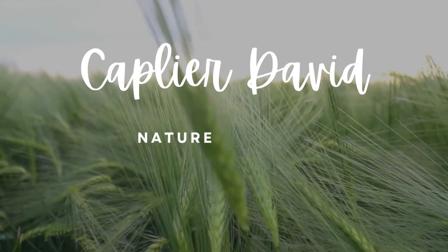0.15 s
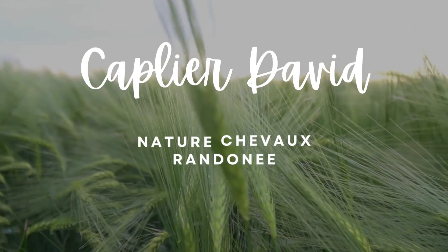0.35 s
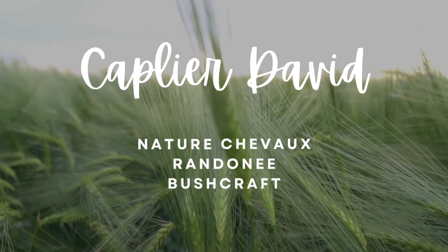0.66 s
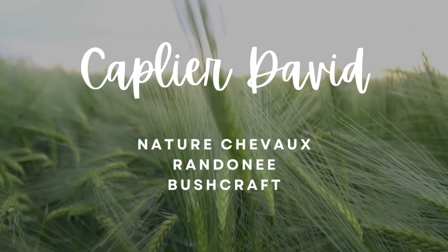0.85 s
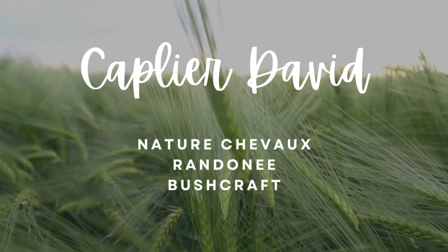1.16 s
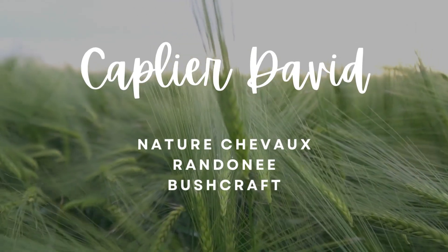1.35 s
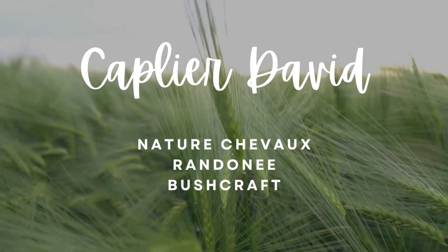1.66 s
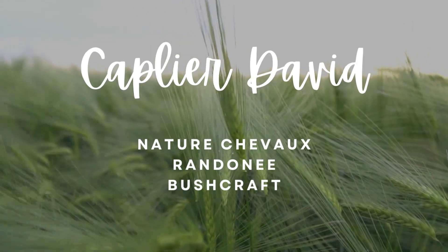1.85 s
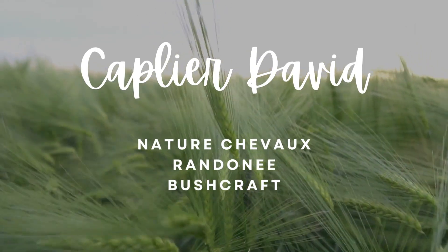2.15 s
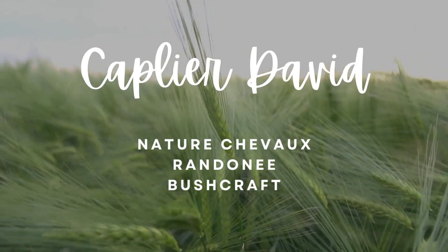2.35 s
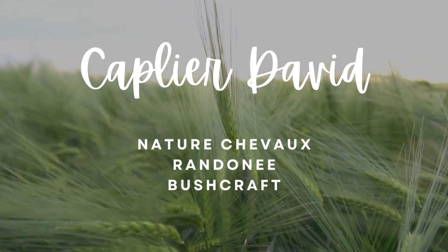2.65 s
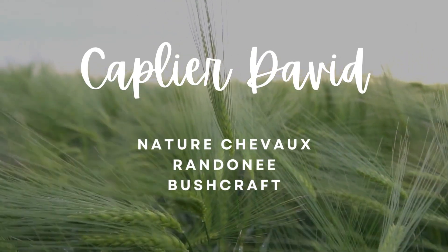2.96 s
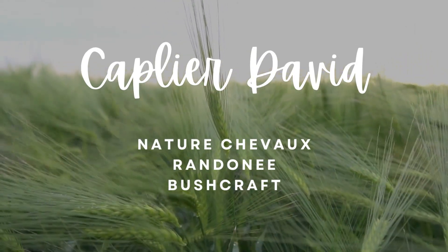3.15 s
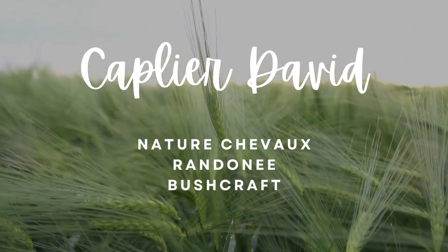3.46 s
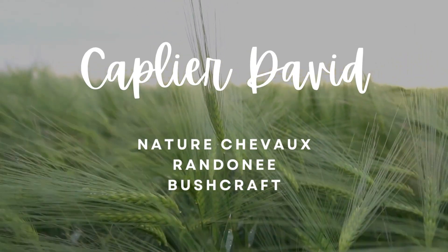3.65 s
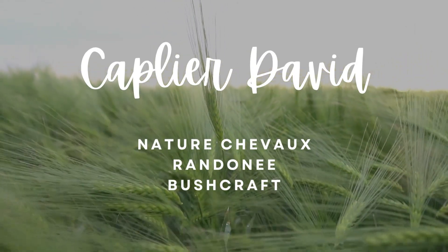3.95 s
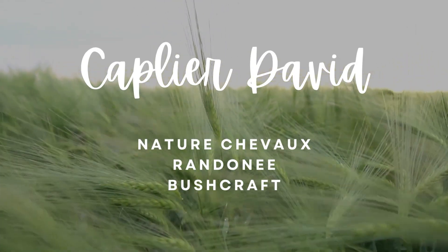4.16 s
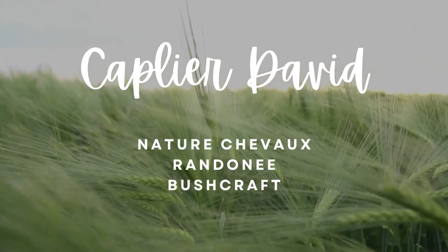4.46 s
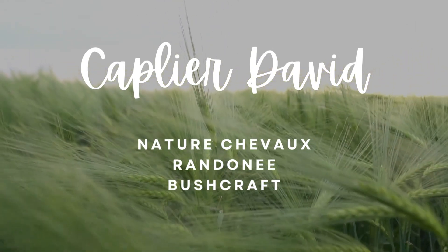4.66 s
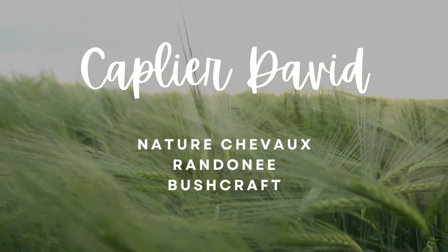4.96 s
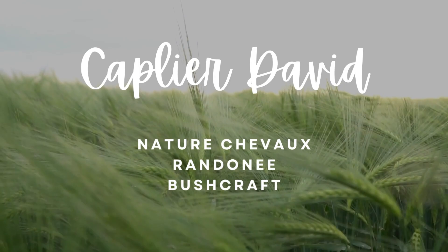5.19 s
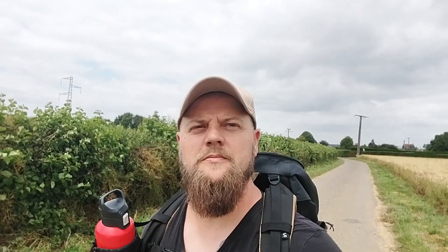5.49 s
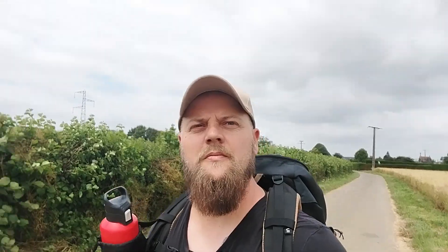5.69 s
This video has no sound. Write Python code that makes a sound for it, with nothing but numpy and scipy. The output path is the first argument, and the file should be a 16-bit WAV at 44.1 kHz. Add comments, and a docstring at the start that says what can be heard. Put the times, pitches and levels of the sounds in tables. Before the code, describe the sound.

Quiet stereo countryside: soft airy hum, swishing crop and fine dry scratching, mostly close by. A clear high cricket repeats pulsed chirps on the left, roughly twice every second at first, then more widely spaced. One buzzy bird call slurs downward near one second; far whistles stay dim. After a final swish comes an abrupt near silence, then low wind buffeting on the microphone.

```python
"""A breeze hums and rustles the barley from the start: noise shaped by spectra, swells and tiny scratches.
Faint crickets and birds sound through echoes, and stalks tap in short bursts of noise.
From 0.3 s a near cricket chirps, four or five wing strokes of falling tone to a chirp; at 1.1 s a small
bird calls once in gliding tones. Near 5.5 s the field drops almost to silence, then low noise
that swells quickly makes wind buffet the microphone."""
import sys
import numpy as np
from scipy import signal
from scipy.fft import rfft, irfft, next_fast_len
from scipy.io import wavfile

SR = 44100
rng = np.random.default_rng(int(sys.argv[2]) if len(sys.argv) > 2 else 0)


def int16_out(signal):
    """Quantize to a 16-bit WAV file."""
    q = np.round(np.clip(np.atleast_2d(signal).T, -1, 1) * 32767)
    wavfile.write(sys.argv[1], SR, q.astype(np.int16))


N = 256869
TIME = np.arange(N) / SR
FIELD_END_S = 5.523
CUTOFF_HZ = 15850

# Noise colours, before each sound is brought to its own level: f/Hz, relative level per Hz/dB
# The breeze's far hum, its brighter ringing edge, the swish of the whole crop, a sliding leaf
HUM_SPECTRUM = [(60, -29.5), (200, -29.5), (300, -25), (420, -12), (600, -1), (800, 0), (1000, 1),
                (1250, -5.5), (1600, -15), (3000, -33)]
EDGE_SPECTRUM = [(600, -28), (880, -6), (990, 4.5), (1120, -7), (1300, -16), (1550, -9), (2100, -16),
                 (3000, -28), (6000, -46)]
SWISH_SPECTRUM = [(300, -8), (1000, -4.5), (1600, 3), (2100, 4), (2500, 1), (3000, 0.5), (3800, -1),
                  (5000, -2), (7000, -5), (10000, -8.5), (16000, -5.5)]
LEAF_SPECTRUM = [(1200, -17), (2000, -5), (3200, -2), (5500, -1.5), (7000, -7.5), (10000, -7.5),
                 (16000, -26)]
# Stiff ears scrape lower than their fine bristles: f/Hz, relative level per Hz/dB
EAR_SPECTRUM = [(1500, -29.5), (3500, -7), (5500, -4.5), (7200, -4.5), (8400, 0.5), (9700, -1), (11300, -6),
                (13500, -12), (16000, -11)]
BRISTLE_SPECTRUM = [(3000, -23.5), (7200, -17), (9500, -7.5), (11200, 1), (13500, -2.5), (16000, -3)]
# Wind rumble at the microphone, and the smaller eddies of a stronger gust: f/Hz, relative level per Hz/dB
BUFFET_SPECTRUM = [(25, -47), (45, -13.5), (70, 1.5), (140, -1.5), (200, 0), (255, -6), (330, -21),
                   (480, -36.5), (800, -48.5), (1500, -52.5), (5000, -45.5), (8500, -53), (12000, -48.5),
                   (16000, -45.5)]
EDDY_SPECTRUM = [(200, -11), (350, 4.5), (600, -5.5), (1000, -18.5), (2000, -20.5), (5000, -31)]

# The breeze's far hum, before its overall gain and flutter: t/s, level/dB
HUM_LEVELS = [(0.0, -57), (1.27, -55), (1.33, -59), (1.91, -58.5), (2.01, -54.5), (2.16, -57),
              (2.19, -60.5), (2.56, -61.5), (2.84, -58.5), (3.5, -59.5), (3.98, -56), (4.04, -57.5),
              (4.32, -57.5), (4.43, -56), (5.2, -58.5)]
# The hum takes on its ringing edge: peak t/s, width/s, level/dB
EDGE_RISES = [(.6, 0.19, -62), (2.02, .1, -59), (3.88, 0.17, -61.5), (4.53, 0.14, -53)]
EDGE_REST_DB = -70.5
# Gusts through the whole crop: peak t/s, width/s, level/dB
CROP_GUSTS = [(.12, 0.097, -66), (5.42, 0.3, -54.5)]
SWISH_REST_DB = -61.5
# A leaf slides softly past, before its flutter: peak t/s, width/s, level/dB
LEAF_PASSES = [(.11, .04, -68), (.68, 0.064, -63.5), (3.87, 0.17, -60.5), (5.48, 0.33, -58)]
# The nearest ears sway into each other, before the ear and bristle gains:
# t/s, length before dying away/s, level/dB, left over right/dB
EAR_SWAYS = [(.95, 0.073, -60, -4), (1.13, 0.18, -60, -3), (1.386, 0.35, -56, -5), (1.721, .1, -53.5, -3.5),
             (1.806, 0.09, -51.5, -2.5), (2.033, 0.034, -60.5, -5), (2.208, .18, -55.5, -7.5),
             (2.48, 0.26, -57.5, -5.5), (2.737, .18, -55.5, -6), (2.957, 0.092, -59, -5),
             (3.06, .12, -56, -3.5), (3.385, .08, -63.5, -4), (3.654, 0.12, -56, -.5),
             (3.86, 0.18, -60.5, 0), (5.33, 0.23, -58.5, 1.5)]
SWAY_ATTACK_S, SWAY_RELEASE_S = 0.028, 0.059
RUSTLE_REST_DB = -63  # between sways the ears still stir

# A neighbour's chirps, before the echoes: t/s, strokes, level/dB
ANSWER_CHIRPS = [(.03, 3, -67), (3.3, 3, -64.5), (4.24, 3, -62.5), (4.68, 4, -65)]
# Stalks snapping and tapping: t/s, level/dB, centre f/Hz, decay/s, left over right/dB
STALK_TAPS = [(.035, -47, 2137, 0.0037, -1), (.137, -46, 4600, 0.0019, 2), (.621, -50, 4270, .003, -9),
              (0.65, -49.5, 1840, 0.0031, -6), (1.381, -46, 11000, 0.0037, -9),
              (1.513, -45, 11200, .003, -11), (1.563, -42.5, 11040, .003, -13),
              (1.707, -49.5, 4300, 0.0048, -8), (1.842, -48, 4480, .004, -9),
              (1.9, -47.5, 4100, 0.0046, -15), (2.07, -50.5, 11000, 0.0033, -6),
              (2.263, -45, 11000, 0.0033, -17), (2.284, -44.5, 7760, 0.0018, -5),
              (2.389, -52, 11060, 0.0025, -4.5), (2.839, -49, 9900, .003, -2),
              (3.058, -43, 13500, .002, -12)]

# Far birds' whistles: t/s, length/s, start f/Hz, end f/Hz, level/dB, left over right/dB
FAR_WHISTLES = [(0.269, 0.34, 2561, 2620, -71, 8), (1.74, 0.13, 2217, 2066, -67, -6),
                (2.281, 0.12, 2430, 2370, -73, -3), (3.456, 0.22, 2060, 1970, -73, -22),
                (4.148, .2, 2130, 2060, -72.5, 6), (4.756, 0.14, 2620, 2603, -63, 3),
                (5.118, 0.059, 6050, 5950, -59, 10)]
# The near bird's syllables: t/s, length/s, start f/Hz, end f/Hz, level/dB, roughness/0-1
BIRD_SYLLABLES = [(1.089, 0.042, 6650, 6320, -57.5, 0.7), (1.13, 0.044, 4260, 6550, -60.5, .9),
                  (1.176, 0.038, 6250, 6460, -55, 1.0), (1.212, .024, 6300, 5320, -50.5, .35),
                  (1.223, 0.063, 5280, 4790, -51, .08)]
GLIDE_SETTLING = 2.4  # a syllable's glide slows as it nears its end pitch

# One wing stroke; the scraper slows along the file: t from its peak/s, share of pitch, level/dB
# Later strokes stretch these times, and each chirp sets the overall level
STROKE_SHAPE = [(-.017, 0.89, -42.5), (-.0125, .995, -26), (-.009, 1.003, -11.5), (-.005, 1.007, -3.5),
                (0, 1, -1.5), (.004, 0.9915, -4), (.0075, .98, -9), (0.011, .968, -29), (0.016, 0.927, -58)]
FLICK_DELAY_S, FLICK_WIDTH_S = 0.0137, 0.002  # stretched too
# Chirps: first stroke t/s, strokes, full pitch f/Hz, full level/dB, first stroke weaker by/dB,
# slowing/s, left over right/dB, full closing flick before its gain/dB
CRICKET_CHIRPS = [(.292, 5, 4317, -52.5, 17, 0.0012, 13, -47.5), (.923, 4, 4307, -43, 12, 0.0014, 24, -51),
                  (1.419, 5, 4320, -42, 10.5, .00145, 25, -49.5),
                  (2.057, 4, 4300, -37.5, 11.5, 0.0013, 9.5, -51),
                  (2.592, 4, 4330, -39, 6, .001, 8.5, -51.5), (3.085, 4, 4330, -42.5, 3.5, .0008, 7, -52.5),
                  (3.604, 5, 4317, -45, 5, .0012, 23, -51.5), (4.373, 5, 4305, -38, 6, .0012, 14, -54.5),
                  (5.057, 5, 4302, -40, 2, 0.0011, 12.5, -53.5)]
STROKE_GAP_S = .0493  # first gap; later ones add slowing times the stroke's number squared
FIRST_FLAT_HZ, FIRST_FLICK_WEAKER_DB = 72, 6.5  # the first stroke is flat and closes gently
WEAKNESS_KEPT, FLATNESS_KEPT = 0.4, 0.47  # share of that shortfall left in each next stroke

# Puffs of wind on the microphone: peak t/s, width/s, level/dB
WIND_PUFFS = [(.66, .06, -78.5), (1.33, .05, -77.5), (1.59, .045, -72)]
PUFF_REST_DB = -94
GUST_START_S, GUST_RISE_S, GUST_DB = 5.64, 0.027, -31.5  # the strong gust at the end


def from_db(db):
    """Turn decibels into gain."""
    return 10 ** (np.asarray(db) / 20)


def rms_one(x):
    """Scale a sound to an rms of 1."""
    return x / np.sqrt(np.mean(x ** 2) + 1e-20)


def bell(t, width):
    """A smooth bump, 1 at time zero."""
    return np.exp(-.5 * (t / width) ** 2)


def panned(pan_db):
    """Left and right gains of constant power; positive leans left."""
    pair = from_db(np.array([[.5], [-.5]]) * pan_db)
    return pair / np.sqrt(np.mean(pair ** 2, axis=0))


def drift(rate):
    """A smooth random wander of rms about 1; a higher rate in Hz makes it quicker."""
    # worked out at every 20th sample, then joined by straight lines
    r = np.exp(-40 * np.pi * rate / SR)
    noise = rng.standard_normal(N // 20 + 4002)
    slow = signal.lfilter([1], [1, -2 * r, r * r], noise)[4000:]
    return np.interp(np.arange(N) / 20, np.arange(len(slow)), rms_one(slow))


def tone(hz):
    """A sine of rms 1 that follows a pitch curve."""
    return np.sqrt(2) * np.sin(2 * np.pi * np.cumsum(hz) / SR)


def stereo_noise(likeness):
    """White noise, partly shared by the two sides."""
    mid, side = rng.standard_normal((2, N))
    shared = np.clip(likeness, 0, .99)
    return np.sqrt((1 + shared) / 2) * mid + np.sqrt((1 - shared) / 2) * side * [[1], [-1]]


def coloured(x, spectrum):
    """Give a sound a spectrum and an rms of 1."""
    hz, db = np.transpose(spectrum)
    size = next_fast_len(N + SR // 10)
    bins = np.maximum(np.fft.rfftfreq(size, 1 / SR), 1)
    gain = from_db(np.interp(np.log(bins), np.log(hz), db))
    gain *= np.minimum(bins / hz[0], 1) ** 2  # fade the bass below the first row
    return rms_one(irfft(rfft(x, size) * gain)[:, :N])


def scatter(x, t60, first_s):
    """Countless small echoes off the stalks, different on each side, falling 60 dB in t60 seconds."""
    t = np.arange(SR // 2) / SR
    onset = np.clip(t / first_s - 1, 0, 1)  # silent until first_s, full at twice that
    echoes = rng.standard_normal((2, len(t))) * from_db(-60 * t / t60) * onset
    echoes /= np.sqrt(np.sum(echoes ** 2, axis=1, keepdims=True))
    return signal.fftconvolve(x[None], echoes, axes=1)[:, :N]


def swells(rows, rest_db=-120):
    """Gain of bell-shaped swells over a resting level, their powers added."""
    power = from_db(rest_db) ** 2
    for s, width, db in rows:
        power = power + (from_db(db) * bell(TIME - s, width)) ** 2
    return np.sqrt(power)


def rustle(spectrum, touches_per_s, size_db, touch_s, smooth_share, flutter_db, likeness):
    """Ears of barley brush each other in many tiny scratches over a smooth hiss."""
    sizes = from_db(size_db * np.minimum(rng.exponential(1, N), 3.5)) ** 2
    touches = (rng.random(N) < touches_per_s / SR) * sizes
    r = np.exp(-1 / (touch_s * SR))
    power = signal.lfilter([1], [1, -2 * r, r * r], touches + 1e-18)  # each scratch swells and dies
    grain = np.sqrt(smooth_share + (1 - smooth_share) * power / power.mean())
    flutter = from_db(flutter_db * drift(33))
    return coloured(stereo_noise(likeness) * grain * flutter, spectrum)


def swaying():
    """Left and right gain of the nearest ears: each sway sets in, holds and dies away to a faint stir."""
    power = from_db(RUSTLE_REST_DB) ** 2
    for s, length, level_db, pan_db in EAR_SWAYS:
        attack = np.clip((TIME - s) / SWAY_ATTACK_S, 0, 1)
        release = np.exp(-np.maximum(TIME - s - length, 0) / SWAY_RELEASE_S)
        power = power + (attack * release * from_db(level_db) * panned(pan_db)) ** 2
    return np.sqrt(power)


def breeze(hum_gain_db=1.55, hum_pan_db=-6.5, edge_pan_db=-8, swish_pan_db=-2,
           ears_db=-2.5, bristles_db=-2.0, ears_pan_db=1.5, bristles_pan_db=-5.0):
    """Moving air: a hum from afar, the swish of the whole crop, the rustle of the nearest ears and leaves."""
    hum_db = np.interp(TIME, *np.transpose(HUM_LEVELS)) + hum_gain_db + 0.44 * drift(27)
    hum = coloured(stereo_noise(likeness=0.66), HUM_SPECTRUM) * from_db(hum_db) * panned(hum_pan_db)

    edge = coloured(stereo_noise(likeness=0.12), EDGE_SPECTRUM)
    edge = edge * swells(EDGE_RISES, EDGE_REST_DB) * panned(edge_pan_db)
    swish = coloured(stereo_noise(likeness=0.22), SWISH_SPECTRUM)
    swish = swish * swells(CROP_GUSTS, SWISH_REST_DB) * panned(swish_pan_db)
    leaf = coloured(stereo_noise(likeness=0.71), LEAF_SPECTRUM)
    leaf = leaf * swells(LEAF_PASSES) * from_db(2 * drift(60))

    ears = rustle(EAR_SPECTRUM, touches_per_s=600, size_db=5.0, touch_s=0.00057,
                  smooth_share=0.75, flutter_db=1.25, likeness=0.86)
    bristles = rustle(BRISTLE_SPECTRUM, touches_per_s=840, size_db=2.0, touch_s=0.00044,
                      smooth_share=.45, flutter_db=1.3, likeness=1.0)
    near = ears * from_db(ears_db) * panned(ears_pan_db)
    near = near + bristles * from_db(bristles_db) * panned(bristles_pan_db)
    near = near * swaying() * from_db(0.95 * drift(25))
    return hum + edge + swish + leaf + near


def far_chorus(hz=2520, wander=.04, level_db=-70, swell_db=5.0, pan_db=2):
    """Very distant birdsong melts into a faint band: one wavering tone, blurred by echoes."""
    song = tone(hz * (1 + wander * drift(40))) * from_db(swell_db * drift(20))
    return from_db(level_db) * scatter(rms_one(song), t60=0.1, first_s=0.0059) * panned(pan_db)


def far_crickets(hz=4330, stroke_gap_s=0.0493, stroke_s=0.0085, blur=0.016, pan_db=2):
    """A neighbour answers with bell-shaped strokes of tone, blurred by distance."""
    level = np.zeros(N)
    for s, count, level_db in ANSWER_CHIRPS:
        for k in range(round(count)):
            level += from_db(level_db) * bell(TIME - s - k * stroke_gap_s, stroke_s)
    song = tone(hz * (1 + blur * drift(99.44))) * level
    return scatter(song, t60=0.089, first_s=0.0017) * panned(pan_db)


def stalk_ticks():
    """Dry stalks knock together: a brief burst in one broad resonance."""
    out, t = np.zeros((2, N)), np.arange(SR // 20) / SR
    for s, level_db, hz, decay, pan_db in STALK_TAPS:
        edges = [hz * 0.93, min(hz * 1.12, SR * .44)]
        band = signal.butter(1, edges, "band", fs=SR, output="sos")
        ring = rms_one(signal.sosfilt(band, rng.standard_normal(len(t))))
        start = int(s * SR)
        burst = ring * np.exp(-t / decay) * from_db(level_db)
        out[:, start:start + len(t)] += burst * panned(pan_db)
    return out


def note_span(s, length):
    """The samples of a note, and its progress from 0 to 1."""
    span = slice(int(s * SR), int((s + length) * SR))
    return span, np.linspace(0, 1, span.stop - span.start)


def whistles():
    """Far birds whistle plain notes that glide evenly, swell and fade."""
    out, waver = np.zeros((2, N)), 1 + 0.0028 * drift(30)
    for s, length, start_hz, end_hz, level_db, pan_db in FAR_WHISTLES:
        span, u = note_span(s, length)
        hz = (start_hz + (end_hz - start_hz) * u) * waver[span]
        swell = np.sqrt(4 * u * (1 - u))
        out[:, span] += tone(hz) * swell * from_db(level_db) * panned(pan_db)
    return out


def syllables(buzz):
    """Each syllable swells, glides to its end pitch and fades; a rough one buzzes."""
    call, shake = np.zeros(N), buzz * drift(400)
    for s, length, start_hz, end_hz, level_db, rough in BIRD_SYLLABLES:
        span, u = note_span(s, length)
        hz = end_hz + (start_hz - end_hz) * (1 - u) ** GLIDE_SETTLING
        call[span] += tone(hz * (1 + rough * shake[span])) * np.sin(np.pi * u) * from_db(level_db)
    return call


def birds(buzz=0.042, pan_db=3, echo_db=-19, far_echo_db=-8):
    """Far whistles, and one near call, buzzy at first and then a clean falling slur; all echo."""
    far = whistles()
    call = syllables(buzz)
    sent = from_db(echo_db) * call + from_db(far_echo_db) * far.mean(axis=0)
    return call * panned(pan_db) + far + scatter(sent, t60=0.47, first_s=0.012)


def strokes():
    """Through a chirp the strokes grow louder, rise to full pitch and come more slowly."""
    for s, count, hz, level_db, weaker_db, slowing, pan_db, flick_db in CRICKET_CHIRPS:
        for k in range(round(count)):
            weak, flat = WEAKNESS_KEPT ** k, FLATNESS_KEPT ** k
            stroke_hz = hz - FIRST_FLAT_HZ * flat
            stroke_db = level_db - weaker_db * weak
            closing_db = flick_db - FIRST_FLICK_WEAKER_DB * flat
            yield k, s, stroke_hz, stroke_db, pan_db, closing_db
            s += STROKE_GAP_S + slowing * k ** 2


def cricket(waver=0.0034, flutter_db=1.0, flick_gain_db=-0.5, lengthening=.03, near_db=-13, far_db=-22):
    """Each closing of the wings rings them in a falling tone and ends in a short, lower flick."""
    offset, share, shape_db = np.transpose(STROKE_SHAPE)
    direct, song = np.zeros((2, N)), np.zeros(N)
    unsteady = 1 + waver * drift(200)
    grip = from_db(flutter_db * drift(150))
    for earlier, s, hz, level_db, pan_db, flick_db in strokes():
        # the wings open wider with every stroke of a chirp, so the strokes lengthen
        stretch = 1 + lengthening * (earlier - 2)
        span = slice(int((s + offset[0] * stretch) * SR), int((s + offset[-1] * stretch) * SR))
        t = (TIME[span] - s) / stretch
        wing = tone(hz * np.interp(t, offset, share) * unsteady[span]) * grip[span]
        swell = from_db(np.interp(t, offset, shape_db))
        flick = from_db(flick_db + flick_gain_db) * bell(t - FLICK_DELAY_S, FLICK_WIDTH_S)
        stroke_gain = from_db(level_db) * swell * panned(pan_db)
        direct[:, span] += wing * (stroke_gain + flick * panned(.6 * pan_db))
        # the sound sent into the field is steadier than the beam that comes straight over
        song[span] += wing * (from_db(-37.0) * swell + from_db(8.0) * flick)
    near = from_db(near_db) * scatter(song, t60=0.072, first_s=0.0031)
    far = from_db(far_db) * scatter(song, t60=0.51, first_s=0.023)
    return direct + near + far


def buffeting(pan_db=-2, eddies_db=-23, build_up_s=0.11):
    """Eddies at the microphone ports rumble, separately on each side, and grow brighter as the gust builds."""
    puffs = swells(WIND_PUFFS, PUFF_REST_DB) * (TIME < FIELD_END_S)
    since_gust = np.maximum(TIME - GUST_START_S, 0)
    gust = puffs + from_db(GUST_DB) * (1 - np.exp(-since_gust / GUST_RISE_S))
    r = np.exp(-1 / (build_up_s * SR))
    built_up = signal.lfilter([1 - r], [1, -r], gust)  # the small eddies lag behind the gust
    rumble = coloured(rng.standard_normal((2, N)), BUFFET_SPECTRUM) * gust
    eddies = coloured(rng.standard_normal((2, N)), EDDY_SPECTRUM) * built_up * from_db(eddies_db)
    return (rumble + eddies) * panned(pan_db)


def scene():
    """The field until it drops almost to silence, and the wind on the microphone."""
    field = breeze() + far_chorus() + far_crickets() + stalk_ticks() + birds() + cricket()
    heard = np.clip((FIELD_END_S - TIME) / .008 + .5, .003, 1)  # falls within 8 ms
    return field * heard + buffeting()


def record(dry):
    """Cut the treble above CUTOFF_HZ with a steep filter."""
    lowpass = signal.firwin(601, CUTOFF_HZ, fs=SR)
    return signal.fftconvolve(dry, lowpass[None], "same", axes=1)


dry = scene()
out = record(dry)
int16_out(out)
```